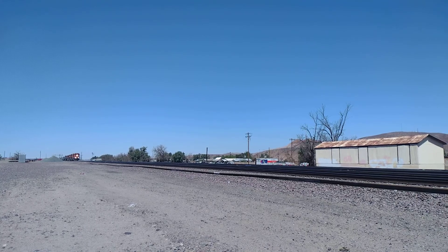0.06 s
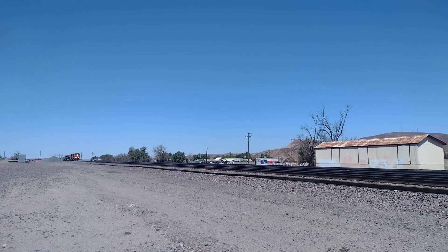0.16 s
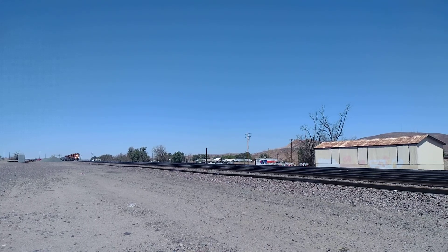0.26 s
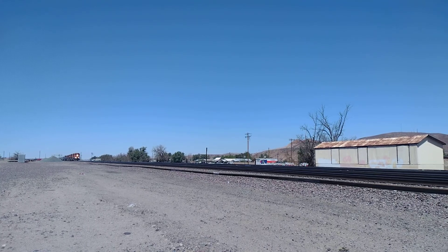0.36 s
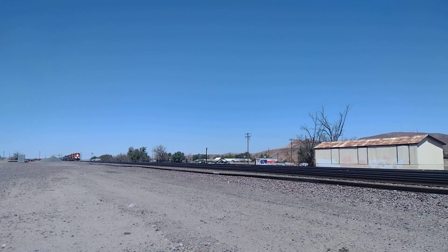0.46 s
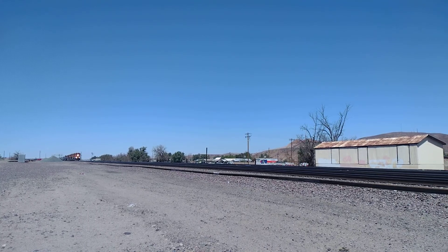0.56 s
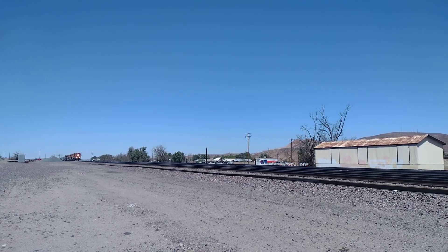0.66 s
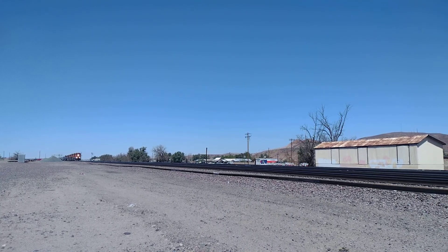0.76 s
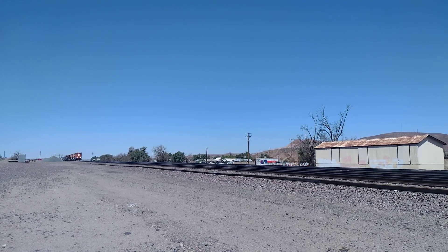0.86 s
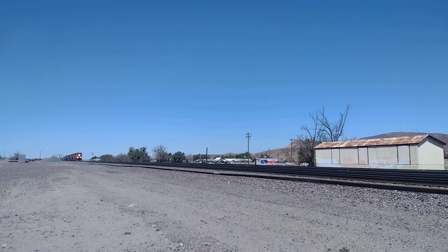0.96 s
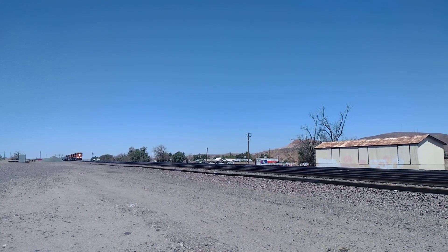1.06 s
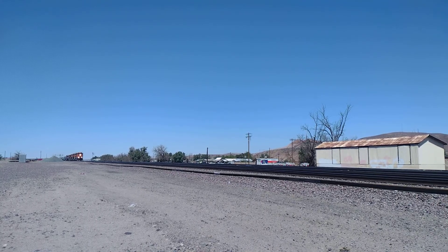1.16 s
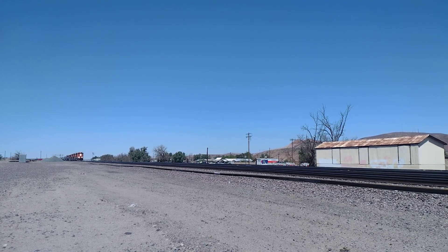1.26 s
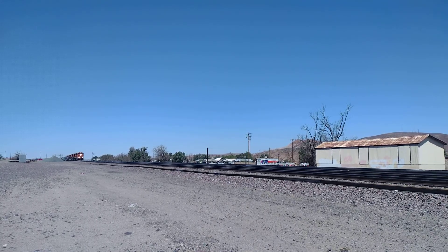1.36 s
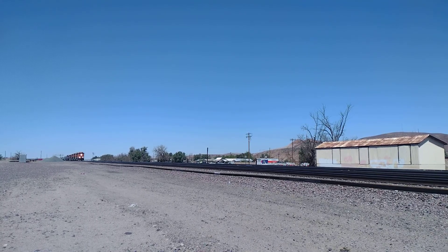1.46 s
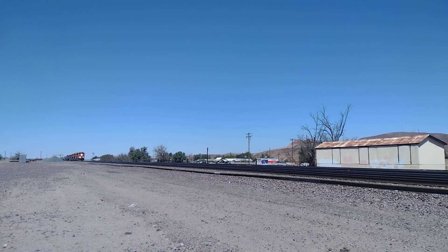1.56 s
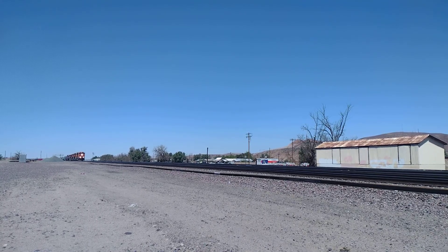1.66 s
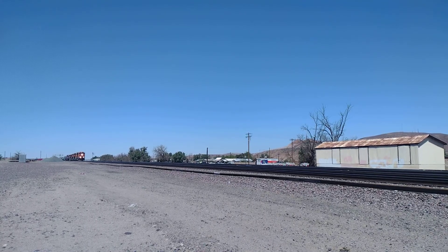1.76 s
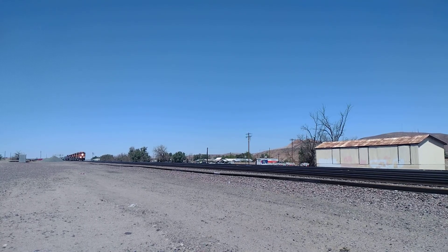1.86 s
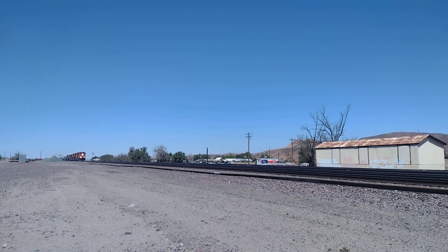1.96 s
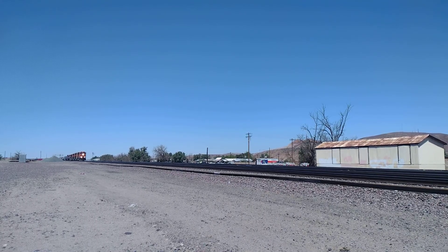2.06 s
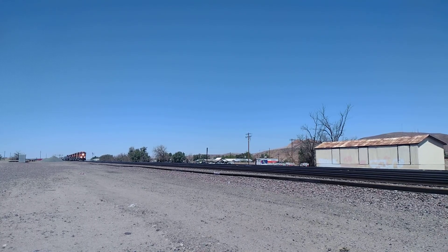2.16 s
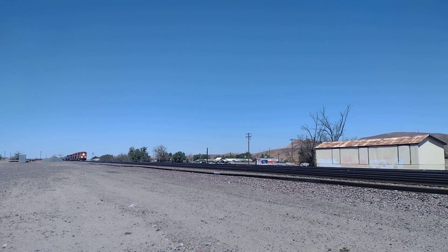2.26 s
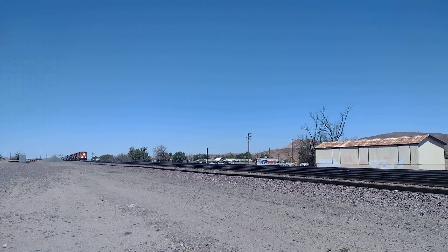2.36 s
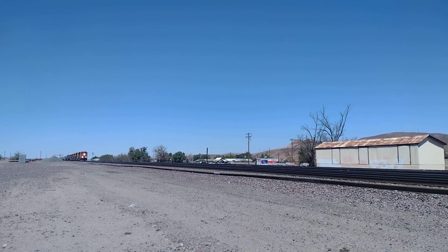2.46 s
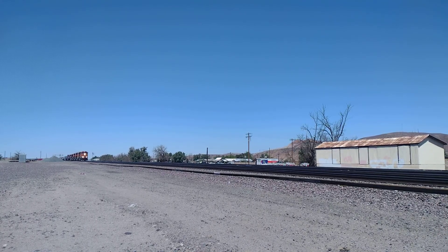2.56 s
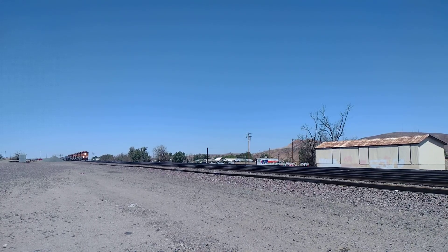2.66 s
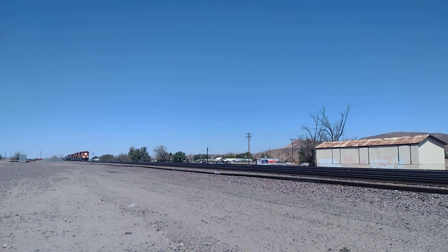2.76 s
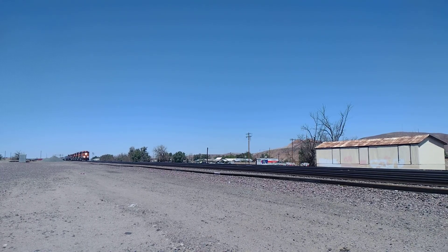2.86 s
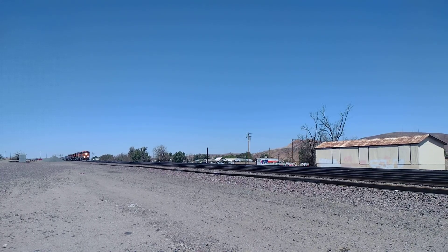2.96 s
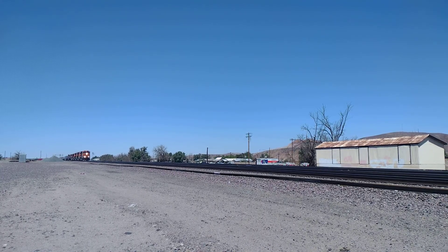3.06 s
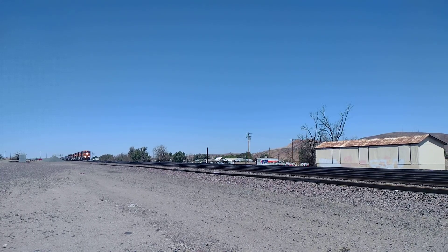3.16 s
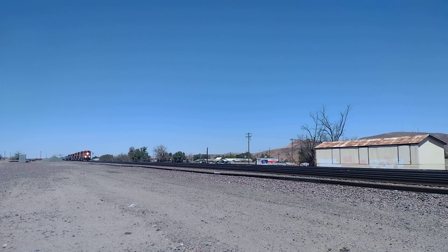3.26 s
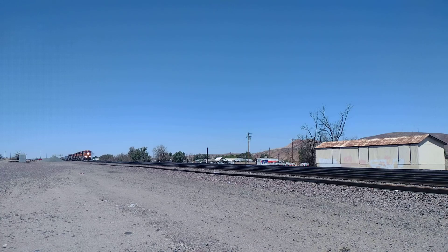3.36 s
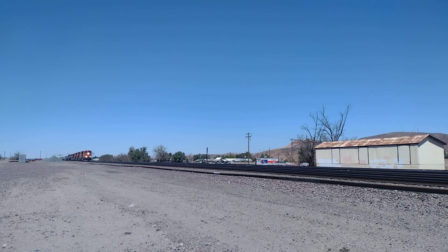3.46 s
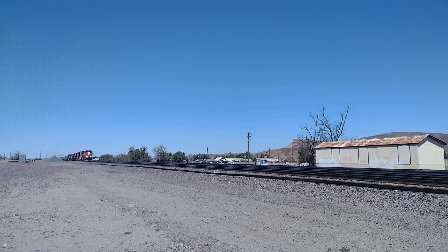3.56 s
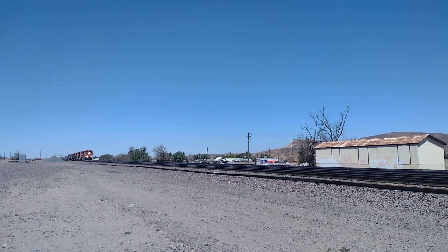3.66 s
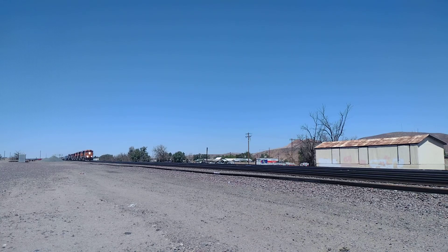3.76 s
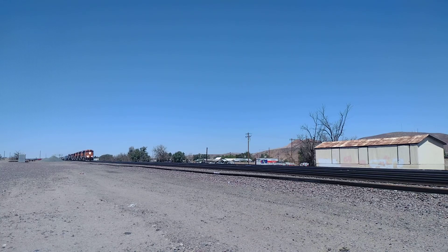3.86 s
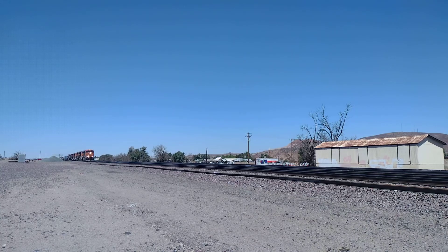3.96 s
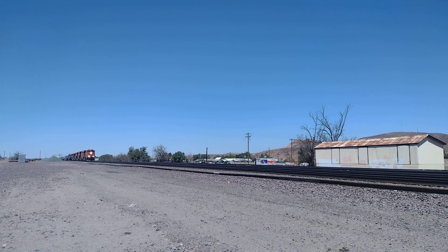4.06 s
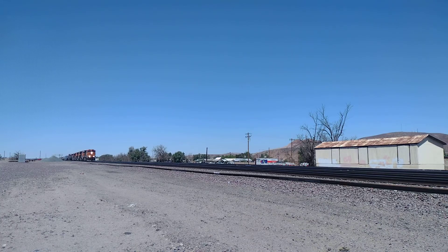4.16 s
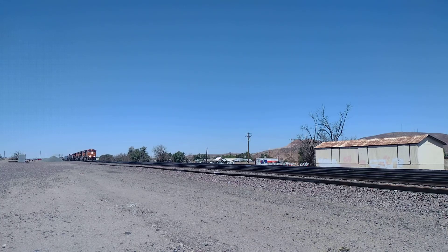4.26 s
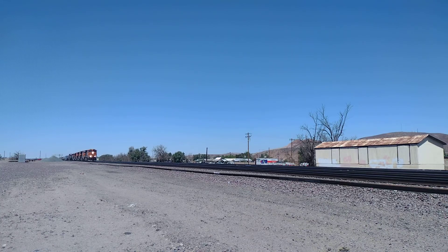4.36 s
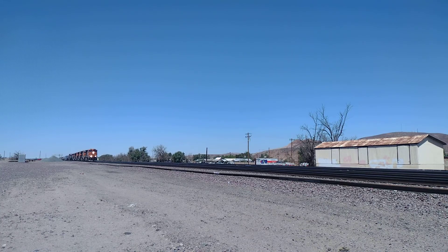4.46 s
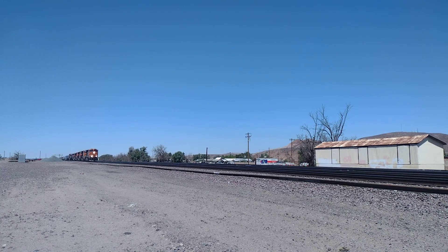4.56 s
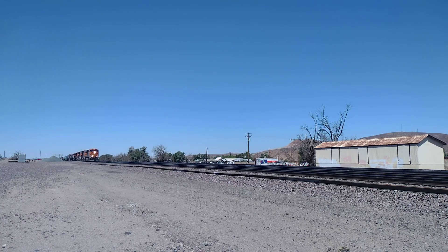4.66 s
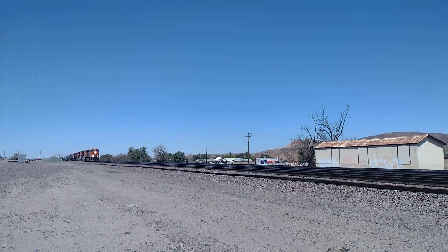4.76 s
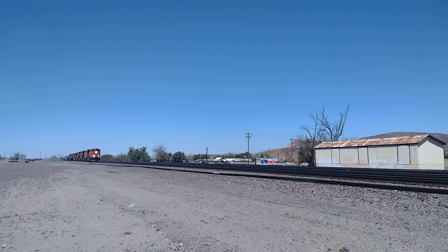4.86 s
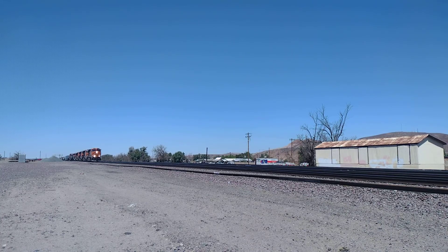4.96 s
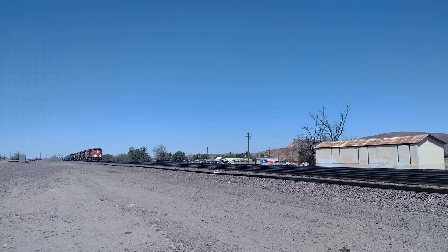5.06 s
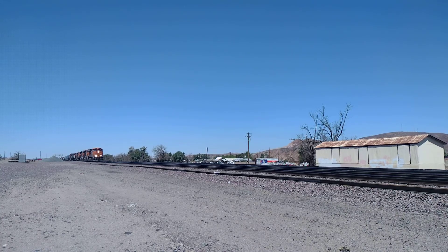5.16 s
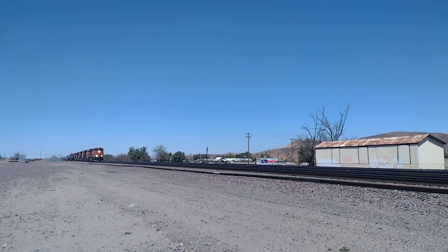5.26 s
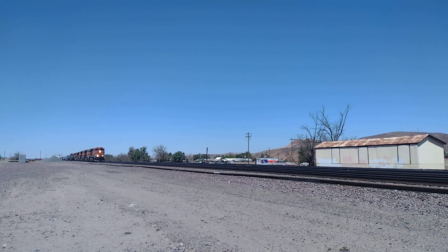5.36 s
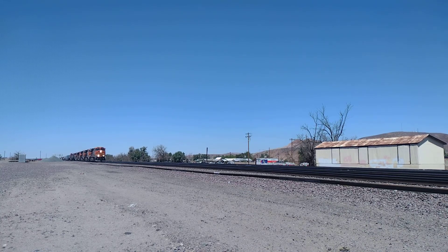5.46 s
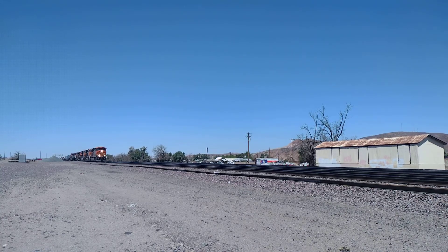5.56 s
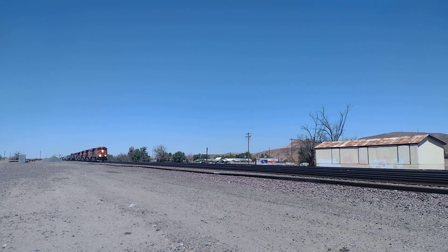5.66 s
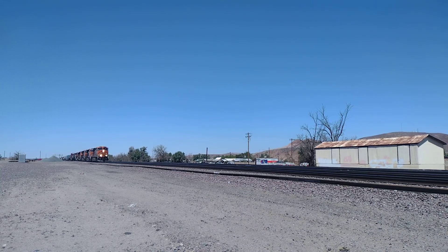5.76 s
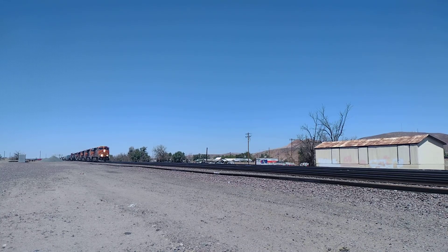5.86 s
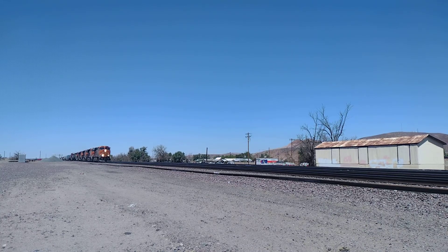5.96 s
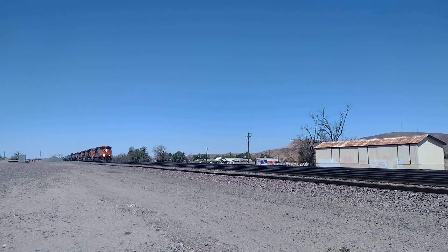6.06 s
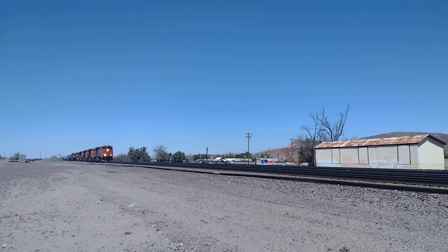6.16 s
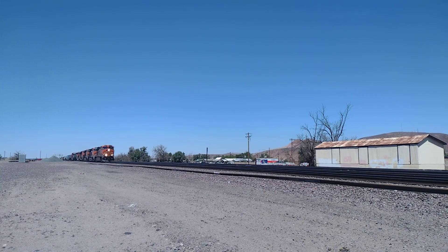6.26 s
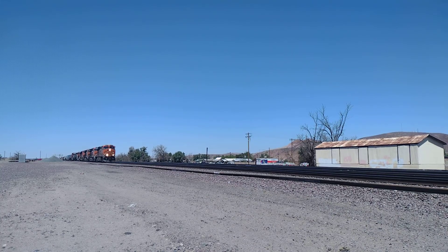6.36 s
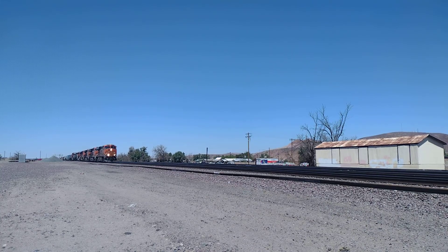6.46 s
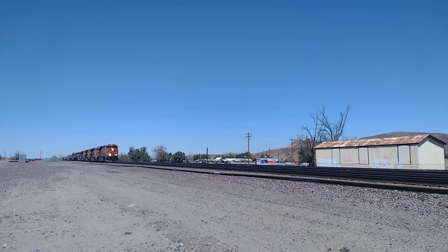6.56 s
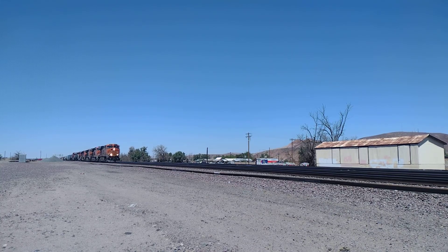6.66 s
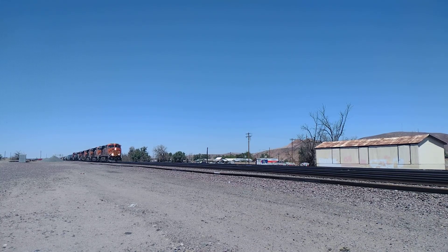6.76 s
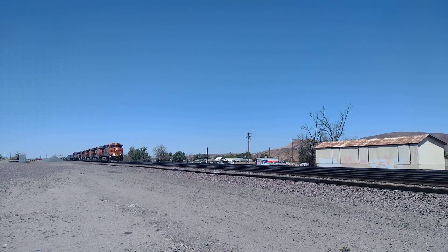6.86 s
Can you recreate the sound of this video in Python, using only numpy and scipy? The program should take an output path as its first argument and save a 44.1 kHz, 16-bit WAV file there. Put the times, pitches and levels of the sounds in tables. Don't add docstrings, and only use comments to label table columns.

```python
import sys
import numpy as np
from scipy import signal
from scipy.fft import rfft, irfft, next_fast_len
from scipy.io import wavfile
from scipy.ndimage import uniform_filter1d, map_coordinates

SR = 44100
rng = np.random.default_rng(int(sys.argv[2]) if len(sys.argv) > 2 else 0)


def bounce(signal):
    frames = np.transpose(np.atleast_2d(signal))
    limited = np.clip(frames, -1, 1)
    pcm = np.round(limited * 32767).astype(np.int16)
    wavfile.write(sys.argv[1], SR, pcm)


def invert_db(x):
    u = np.asarray(x, float) / 20
    return 10 ** u


N = 304731


def unit(x):
    return x / np.sqrt(np.mean(x ** 2) + 1e-20)


def curves(rows, s=None):
    t, *cols = np.transpose(rows)
    at = np.arange(N) / SR if s is None else s
    return [np.interp(at, t, c) for c in cols]


def wobble(rate):
    coarse = np.arange(0, N + 32, 32)
    knots = rng.standard_normal(int(N * rate / SR) + 4)
    return np.interp(np.arange(N), coarse, map_coordinates(knots, [coarse * rate / SR]))


def coloured(x, points):
    size = next_fast_len(N + 8192)
    hz, db = np.transpose(points)
    bins = np.log(np.fft.rfftfreq(size, 1 / SR) + 1)
    gain = invert_db(np.interp(bins, np.log(hz), db, -120, -120))
    return unit(irfft(rfft(x, size) * gain, size)[..., :N])


def panned(x, pan_db):
    return x * invert_db(np.array([pan_db / 2, -pan_db / 2]).reshape(2, -1))


def lay(out, start_s, sound):
    out[:, round(start_s * SR):][:, :sound.shape[1]] += sound


# hz, density_db
AIR_COLOUR = [(1500, -8.5), (2500, 11.5), (3300, 6), (4200, 4), (6000, -0.5), (9000, 0), (12000, -3),
              (15000, -0.4), (16500, -0.2)]


def still_air():
    return invert_db(-84 + 4.5) * coloured(rng.standard_normal((2, N)), AIR_COLOUR)


# time_s, level_db
WIND_LEVEL = [(0.1, -55.5), (0.5, -54), (0.9, -53.5), (1.3, -43.5), (1.7, -37.5), (2.1, -36), (2.5, -31),
              (2.9, -36.5), (3.3, -27), (3.7, -34.5), (4.1, -22.5), (4.5, -25), (4.9, -32.5), (5.3, -27.5),
              (5.7, -34), (6.1, -25), (6.5, -32.5)]
# hz, density_db
WIND_COLOUR = [(15, -34), (33, -21), (50, -11.5), (70, -3.5), (100, -2.5), (170, -7.5), (280, -12.5),
               (400, -25), (800, -62)]
# time_s, level_db, port (0 left - 1 right)
EDDY_THUDS = [(1.597, -20, 0.069), (1.979, -23, 0.97), (2.064, -23.5, 0.81), (2.293, -19.5, .1),
              (2.383, -14, 0.32), (2.467, -26.5, 0), (3.232, -20, 0.24), (3.31, -24, 1), (3.356, -18.5, 1),
              (3.563, -23, 1), (3.685, -16, 0.8), (3.927, -23, .9), (4.03, -26, 0), (4.096, -10, 0.91),
              (4.237, -18.5, 0), (5.051, -25, 1), (5.384, -11, 0.91), (5.488, -21, 0.91), (5.777, -23.5, 0),
              (6.025, -17.5, 0.97), (6.09, -11.5, .25), (6.165, -15, 0.26), (6.502, -14, 0.28),
              (6.63, -15, 0.051), (6.715, -9.5, 0.76), (6.794, -11.5, 0.65), (6.835, -23.5, 0)]
# time_s, level_db, pitch_hz, flutter_db over the slap, port (0-1)
EDDY_SLAPS = [(2.423, -20.5, 146, -24, 0.12), (3.09, -24, 126, -20.5, 0.95), (3.465, -24, 163, -14.5, 1),
              (4.429, -13, 106, -16.5, 0.92), (4.455, -23, 199, -31, 0.77), (4.639, -21, 170, -26, 0.85),
              (4.797, -16, 133, -10, 1), (5.166, -20, 191, -13, .75), (5.339, -20.5, 101, -12.5, 0.18),
              (5.549, -20, 151, -31, 1), (5.742, -20, 133, -19.5, .16), (6.215, -13, 146, -18.5, 0.12),
              (6.271, -17.5, 124, -19, 1), (6.69, -16, 177, -14, 0)]


def wind():
    lumps = invert_db(6.2 * np.array([wobble(10), wobble(15)]))
    rumble = unit(lumps * coloured(rng.standard_normal((2, N)), WIND_COLOUR))
    out = np.pad(invert_db(curves(WIND_LEVEL)[0] - 4.5) * rumble, ((0, 0), (0, SR)))
    t = np.arange(-2048, 2048) / SR

    def lump(hz, life_s):
        phase = rng.uniform(0, 2 * np.pi)
        return np.cos(2 * np.pi * hz * t + phase) * np.exp(-(t / life_s) ** 2)

    thud_hz, thud_flutter_db = 106.4, -29
    eddies = [(s, db, thud_hz, thud_flutter_db, port) for s, db, port in EDDY_THUDS] + list(EDDY_SLAPS)
    for s, db, hz, flutter_db, port in eddies:
        thud = lump(.9 * hz, .012) + 0.37 * lump(2.1 * hz, .006)
        flutter = 2.0 * lump(330, 0.0046) + lump(520, 0.0036)
        right = np.clip(port, 0, 1)
        strike = np.outer([1 - right, right], thud + invert_db(flutter_db) * flutter)
        lay(out, s + t[0], invert_db(db + 2.0) * strike)
    return out[:, :N]


# share of its length, pitch_ratio, level_db, burr_depth (0-1)
CHIRP_SHAPE = [(0, .87, -10, 0), (.06, .97, -2, 0), (.16, 1.02, 0, 0), (.2, 1.09, -9, .2),
               (.23, .935, 0, .65), (.54, .865, -1, .5), (.64, .84, -8, .7), (.8, .75, -11, .8),
               (1, .67, -10, .6)]
# start_s, length_s, top_hz, level_db, left_minus_right_db
NEAR_SPARROW = [
    (0.634, 0.08, 4170, -69, -1.5),
    (1.717, 0.085, 4100, -64.5, 0.5),
    (2.497, 0.074, 4200, -61, -4),
    (3.623, .08, 4160, -62, -0.5),
    (6.643, 0.075, 4200, -63, -1),
]
# start_s, length_s, from_hz, to_hz, level_db
LEFT_SLIDES = [(2.135, .012, 4200, 4550, -84), (2.145, .06, 4600, 2800, -81),
               (3.875, .03, 3300, 3250, -73.5), (3.94, 0.033, 3400, 2750, -69),
               (4.992, .025, 3400, 3300, -72), (5.33, .045, 5520, 5250, -80),
               (5.376, .016, 4900, 4750, -78), (5.445, .012, 4950, 4800, -82),
               (5.45, .025, 4250, 4000, -80), (5.663, .03, 5150, 5200, -80), (5.75, .02, 5300, 5250, -83.5),
               (5.812, .025, 5050, 5300, -82), (6.385, .025, 4700, 4400, -86),
               (6.408, .075, 4350, 2850, -73), (6.49, .1, 7500, 7750, -88.5),
               (6.648, .075, 8050, 8200, -78)]
# start_s, length_s, from_hz, to_hz, level_db
AHEAD_SLIDES = [(2.232, .027, 3600, 2750, -77), (2.335, .015, 4100, 3800, -83),
                (3.82, .055, 4800, 3290, -78), (4.885, .02, 4050, 4250, -82),
                (4.925, .035, 3550, 2900, -76), (5.008, .025, 3000, 2650, -74),
                (5.262, .025, 4200, 4500, -80), (5.385, .025, 3600, 3100, -76),
                (6.258, .026, 2500, 2720, -61)]


def sparrow_chirp(length, hz):
    second_voice_hz = 268
    share, ratio, shape_db, burr = np.transpose(CHIRP_SHAPE)
    u = np.linspace(0, 1, round(length * SR))
    turns = np.cumsum(hz * np.interp(u, share, ratio) * (1 + 0.005 * wobble(400)[:len(u)])) / SR
    second = np.sin(2 * np.pi * (turns + second_voice_hz * u * length) + .8 * wobble(80)[:len(u)])
    voices = np.sin(2 * np.pi * turns) + np.interp(u, share, burr) * second
    level = invert_db(np.interp(u, share, shape_db) + 2.7 * u * wobble(160)[:len(u)])
    return voices * level * np.sin(np.pi * u) ** 0.068


def bird_slide(length, from_hz, to_hz):
    u = np.linspace(0, 1, round(length * SR))
    hz = (from_hz + (to_hz - from_hz) * u ** .8) * (1 + .01 * wobble(300)[:len(u)])
    level = invert_db(3 * wobble(70)[:len(u)]) * np.sin(np.pi * u) ** .6
    return level * np.sin(2 * np.pi * np.cumsum(hz) / SR)


def birds():
    out = np.zeros((2, N + SR))
    for s, length, hz, db, pan_db in NEAR_SPARROW:
        lay(out, s, panned(invert_db(db) * sparrow_chirp(length, hz), pan_db))
    for slides, pan_db in [(LEFT_SLIDES, 8), (AHEAD_SLIDES, -2)]:
        for s, length, from_hz, to_hz, db in slides:
            lay(out, s, panned(invert_db(db) * bird_slide(length, from_hz, to_hz), pan_db))
    t = np.arange(SR // 4) / SR
    yard = rng.standard_normal((2, len(t))) * invert_db(-60 * t / 0.16)
    echoes = signal.fftconvolve(out, yard / np.linalg.norm(yard[0]), axes=1)[:, :N]
    return out[:, :N] + invert_db(-6.0) * echoes


# start_s, t60_s, level_db, centre_hz, left_minus_right_db
GRIT_SCUFFS = [(.487, .012, -60, 2800, -1), (.487, .012, -66, 6500, -3), (.585, .02, -80, 5800, 3),
               (.905, 0.42, -64.5, 3980, -4), (.9, 0.45, -64, 2320, -9), (.9, .56, -77.5, 10200, -8.5),
               (.88, .6, -73.5, 6000, -6), (1.035, 0.14, -66.5, 3390, 0), (1.035, .14, -72.5, 5500, -1),
               (.52, 2.3, -71, 2000, 0), (1.595, .06, -70, 3400, 0), (2.055, 0.044, -65, 2500, 1.5),
               (3.018, .22, -55, 2470, 3), (3.024, .2, -81, 6500, 2), (3.022, 0.2, -66, 3700, -0.5)]


def grit():
    out, t = np.zeros((2, N + SR)), np.arange(SR // 2) / SR
    octaves = np.log2(np.fft.rfftfreq(len(t), 1 / SR) + 1)
    for s, t60, db, hz, pan_db in GRIT_SCUFFS:
        rise_s = min(.2 * t60 ** 1.4, .05)
        width_octaves = max(.38, (.02 / t60) ** 1.6)
        grains = invert_db(2.5 * np.repeat(rng.standard_normal(len(t) // 90), 90))
        crackle = (rng.standard_normal(len(t)) + 1.2 * rng.standard_normal((2, len(t)))) * grains
        bell = np.exp(-((octaves - np.log2(hz)) / width_octaves) ** 2)
        band = unit(irfft(rfft(crackle) * bell, len(t)))
        envelope = invert_db(db - 60 * (t / t60) ** 1.38) * (1 - np.exp(-t / rise_s))
        lay(out, s, panned(envelope, pan_db) * band)
    return out[:, :N]


# start_s, level_db, pitch_hz, t60_s
STONE_TICKS = [(.488, -56, 2300, 0.013), (.93, -64, 3900, .02), (.947, -66, 4200, .015),
               (.965, -64, 4100, .02), (.985, -67, 4000, .012), (1.045, -64, 3300, .015),
               (1.068, -66, 3500, .015), (1.594, -52.5, 2600, 0.027), (1.609, -58.5, 2600, .02),
               (1.613, -60, 2200, .01), (2.054, -60, 2500, .02), (3.022, -57.5, 2690, .015),
               (3.028, -53, 2300, .015), (3.034, -53, 2700, .02), (3.045, -54, 2490, .018),
               (3.049, -54, 2100, .012), (3.066, -58, 2500, .015)]


def ticks():
    out, t = np.zeros((2, N + SR)), np.arange(SR // 20) / SR
    crack_db, crack_t60_s, rise_s = -10, .006, .0004
    for s, db, hz, t60 in STONE_TICKS:
        tones = np.sin(2 * np.pi * hz * t) + 0.32 * np.sin(2 * np.pi * 1.2 * hz * t)
        ring = invert_db(-60 * t / t60) * tones
        noise = uniform_filter1d(rng.standard_normal((2, len(t))), size=6)
        crack = invert_db(crack_db - 60 * t / crack_t60_s) * noise
        lay(out, s, invert_db(db) * (ring + crack) * (1 - np.exp(-t / rise_s)))
    return out[:, :N]


# time_s, level_db under its closest
TRAIN_NEARNESS = [(0, -14), (.8, -11.5), (1.5, -7.5), (2.3, -7.5), (3.3, -5), (4.3, -3.5), (5.2, -2.5),
                  (6, -1.5), (6.91, 0.5)]


def nearness_db():
    return curves(TRAIN_NEARNESS)[0]


# hz, density_db
RAIL_COLOUR = [(8500, -41.5), (9500, -18.5), (10700, -13.5), (11900, -15.5), (12500, -6.5), (14500, -0.5),
               (15300, -3), (16000, -4)]
# time_s, rise_db over the song, length_s
RAIL_JOINTS = [(2.766, 6, .02), (3.5, 4, .3), (4.33, 2, .2), (4.687, 3, .05), (4.819, 7, .1),
               (4.989, 5, .04), (5.289, 4.5, .05), (5.737, 4, .12), (5.97, 6, .06), (6.217, 7, .15),
               (6.798, 4, .2)]
# start_s, length_s, pitch_hz, level_db
RAIL_SQUEAKS = [
    (5.955, .06, 15000, -79),
    (5.973, .02, 13100, -87),
    (6.19, .05, 15500, -88),
    (6.246, .08, 14750, -77),
    (6.25, .035, 13700, -72),
    (6.63, .08, 14200, -87.5),
]


def rail():
    t = np.arange(N) / SR
    burst_db = 0
    for s, rise_db, length in RAIL_JOINTS:
        side_s = length * np.where(t < s, .35, 1)
        burst_db = burst_db + rise_db * np.exp(-((t - s) / side_s) ** 2)
    asleep_db = 4 * (1 - np.tanh((t - 2.4) / .8))
    db = -74 + 1.3 * nearness_db() - asleep_db + burst_db
    pan_db = -2.5 - .4 * burst_db
    z = signal.stft(rng.standard_normal((2, N)), nperseg=256)[2]
    field = uniform_filter1d(uniform_filter1d(rng.standard_normal(z.shape[1:]), 3, 0), 12, 1)
    hiss = signal.istft(z * invert_db(1.8 * unit(field)), nperseg=256)[1][:, :N]
    out = panned(invert_db(db + .8 * wobble(25)), pan_db) * coloured(hiss, RAIL_COLOUR)
    for s, length, hz, squeak_db in RAIL_SQUEAKS:
        u = np.linspace(0, 1, round(length * SR))
        flutter = invert_db(squeak_db + 3.5 * wobble(90)[:len(u)])
        squeak = flutter * np.sin(np.pi * u) * np.sin(2 * np.pi * hz * u * length)
        lay(out, s, panned(squeak, -4.5))
    return out


# time_s, left_lead_samples, likeness below 400 Hz (0-1), likeness above (0-1)
PORT_PATHS = [(0, 11, 1, 0.55), (1.3, 11, 1, 0.6), (2, 11, .94, 0.46), (4.4, 17, .9, .7),
              (5.3, 19.7, 1, 0.63), (6.9, 24, .9, 0.6)]
# time_s, centre_hz, gain_db
GROUND_BOUNCE = [(0, 1441, -4.5), (2.2, 1666, -10.5), (3.2, 1570, -6.5), (4.3, 1424, -9), (5.1, 1411, 2.5),
                 (6.9, 1423, 2.5)]


def arriving(patchy_db):
    hz, s, z = signal.stft(rng.standard_normal((2, N)), SR, nperseg=1024)
    hz = hz[:, None]
    lead, alike_low, alike_high = curves(PORT_PATHS, s)
    dip_hz, dip_db = curves(GROUND_BOUNCE, s)
    upper = 1 / (1 + (500 / (hz + 1)) ** 4)
    alike = alike_low * (1 - upper) + alike_high * upper / (1 + (hz / 2200) ** 2)
    alike = np.maximum(alike, .97 / (1 + (hz / 140) ** 4))
    turn = np.arccos(np.clip(alike, 0, 1)) / 2
    mid, side = z[0] * np.cos(turn), z[1] * np.sin(turn)
    shift = np.exp(1j * np.pi * hz * lead / SR)
    field = uniform_filter1d(uniform_filter1d(rng.standard_normal((3, *mid.shape)), 6, 1), 30, 2)
    bounce_db = dip_db * np.exp(-((hz - dip_hz) / 110) ** 2)
    gain_db = patchy_db * unit(field[0] + 0.42 * field[1:]) + bounce_db
    ports = invert_db(gain_db) * [(mid + side) * shift, (mid - side) / shift]
    return signal.istft(ports, nperseg=1024)[1][:, :N]


# peak_s, half_width_s, level_db
BLOWER_SWELLS = [
    [(1.4, 0.5, -64), (6.02, 0.05, -59), (6.12, .04, -57), (6.2, 1.5, -74)],
    [(3.3, 1.3, -69.5), (6.05, .3, -68), (6.5, 1, -74.5)],
    [(5, .1, -78.5), (5.5, .22, -73.5), (6.1, .2, -76.5), (6.8, .2, -75), (.68, .15, -80)],
    [(5.35, .17, -60), (6.45, .2, -64)],
    [(5.35, .2, -58), (3.8, .3, -62)],
]
# centre_hz, half_width_hz
BLOWER_PITCHES = [(1580, 45), (1880, 40), (3400, 380), (1600, 200), (900, 130)]


def blower():
    out, t = np.zeros((2, N)), np.arange(N) / SR
    for swells, (hz, wide) in zip(BLOWER_SWELLS, BLOWER_PITCHES):
        level = sum(invert_db(db) * np.exp(-((t - s) / width) ** 2) for s, width, db in swells)
        band = [(hz - 5.3 * wide, -35), (hz - wide, -3), (hz, 0), (hz + wide, -3), (hz + 4.5 * wide, -35)]
        out += level * coloured(arriving(patchy_db=1.1), band)
    return out


# hz, density_db
LOW_ROAR = [(200, -33), (350, -2), (480, -6), (620, -0.5), (800, -8.5), (1100, -45.5)]
MID_ROAR = [(600, -27), (850, 1), (1150, -0.5), (1350, -5.5), (1700, -26.5)]
HIGH_ROAR = [(1150, -23), (1550, 1.5), (1900, -4.5), (2500, -12.5), (3100, -21), (3600, -28.5),
             (4500, -33.5), (7000, -39.5), (11000, -53.5)]


def wheels():
    t, near_db = np.arange(N) / SR, nearness_db()

    def part(colour, patchy_db, closest_db, grows, clear_s, over_s, shadow_db):
        shadow = shadow_db * (1 - np.tanh((t - clear_s) / over_s)) / 2
        return invert_db(closest_db + grows * near_db - shadow) * coloured(arriving(patchy_db), colour)

    low = part(LOW_ROAR, 0.5, closest_db=-41, grows=0.35, clear_s=3.5, over_s=1.48, shadow_db=15)
    mid = part(MID_ROAR, 2.5, closest_db=-49.5, grows=-0.2, clear_s=2.5, over_s=0.89, shadow_db=19)
    high = part(HIGH_ROAR, 1.6, closest_db=-54.5, grows=1.15, clear_s=1.5, over_s=1.3, shadow_db=1.5)
    return low + mid + high


def drone(lines, twinkle_db):
    t = np.arange(N) / SR
    half_lead = curves(PORT_PATHS)[0] / SR / 2
    at_ports = np.array([t + half_lead, t - half_lead])
    out = np.zeros((2, N))
    for hz, db in lines:
        flicker = np.sqrt(hz / 80)
        phase = rng.uniform(0, 2 * np.pi) + 0.052 * flicker * wobble(2.5)
        level = invert_db(db + twinkle_db * flicker * wobble(2.6))
        out += level * np.sin(2 * np.pi * hz * at_ports + phase)
    return out


# order of its cycle, level_db
LEAD_ORDERS = [(12, -37), (15, -26.5), (16, -42.5), (17, -35.5), (18, -38), (19, -39), (23, -37.5),
               (24, -51), (26, -51.5), (27, -47), (28, -48), (30, -49.5), (34, -49), (37, -46.5), (40, -54),
               (42, -46), (43, -51), (45, -50), (46, -61.5), (48, -56), (51, -58), (61, -62), (62, -64.5),
               (69, -68), (72, -73), (73, -65), (79, -63), (80, -66), (81, -63.5), (85, -70)]
# order of its cycle, level_db
TRAIL_ORDERS = [(4, -59.5), (6, -56.5), (8, -32), (10, -43.5), (14, -54.5)]
# pitch_hz, level_db
FAN_TONES = [(52.3, -50), (75.58, -43), (98.73, -46), (120.95, -49), (137.45, -42)]
# hz, density_db
EXHAUST_RUMBLE = [(20, -30.5), (33, -25.5), (42, -17.5), (50, -9.5), (60, -7.5), (85, -3), (120, -2.5),
                  (200, -5.5), (260, -12), (350, -21.5), (500, -28.5), (900, -68)]
# time_s, level_db
TONE_WAVER = [(0, .5), (.77, 1.5), (1.02, -3), (1.46, -3), (2.12, 2.5), (2.31, -2.5), (2.52, 0.5),
              (3.25, 2.5), (3.37, -10.5), (3.5, 0.5), (4.23, 0.3), (4.5, -2.5), (4.64, 1.5), (5.06, -1.5),
              (5.37, 2.5), (6.29, -2), (6.46, 3), (6.91, -1.5)]


def diesels():
    near_db, waver_db = nearness_db(), curves(TONE_WAVER)[0]
    lead_cycle_hz, trail_cycle_hz = 5.1555, 10.669
    lead = [(k * lead_cycle_hz, db) for k, db in LEAD_ORDERS]
    trail = [(k * trail_cycle_hz, db) for k, db in TRAIL_ORDERS]
    tones = drone(lead + trail + list(FAN_TONES), twinkle_db=-0.06)
    rumble_db = -23.5 + 1.456 * near_db - 0.42 * waver_db
    rumble = invert_db(rumble_db) * coloured(arriving(patchy_db=1.5), EXHAUST_RUMBLE)
    return invert_db(7.5 + near_db + waver_db) * tones + rumble


def scene():
    yard = still_air() + wind() + birds() + grit() + ticks()
    return yard + rail() + blower() + wheels() + diesels()


def band_limit(x):
    return signal.sosfilt(signal.butter(12, 16640, fs=SR, output="sos"), x)


def record(dry):
    size, top_hz = next_fast_len(N + SR), 15800
    held = dry / (1 + abs(dry / .5) ** 8) ** (1 / 8)
    passed = np.fft.rfftfreq(size, 1 / SR) < top_hz
    limited = irfft(rfft(held, size) * passed, size)[:, :N]
    return band_limit(limited)


dry = scene()
out = record(dry)
bounce(out)
```